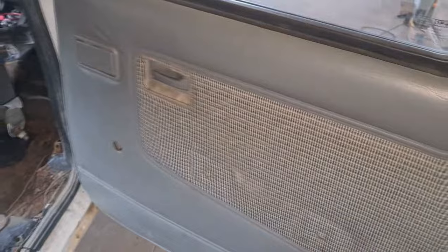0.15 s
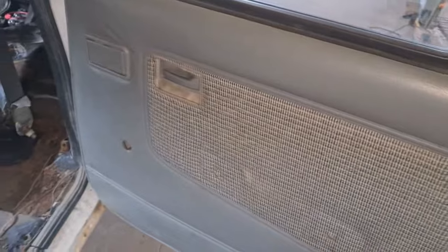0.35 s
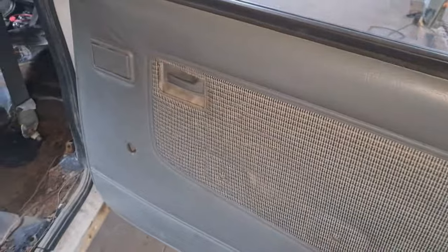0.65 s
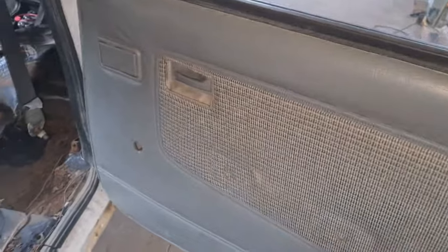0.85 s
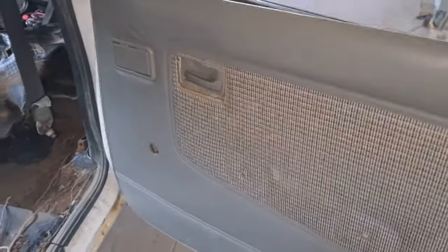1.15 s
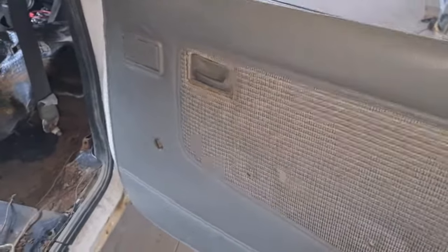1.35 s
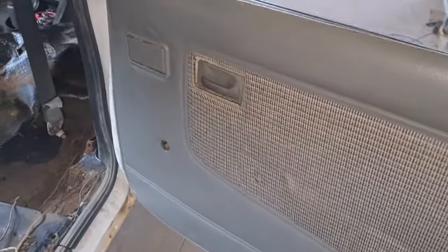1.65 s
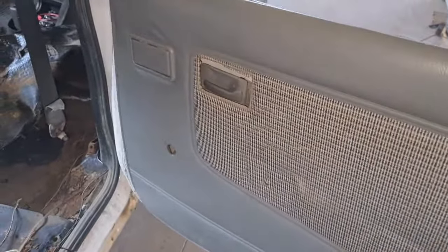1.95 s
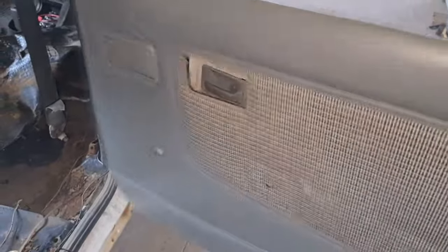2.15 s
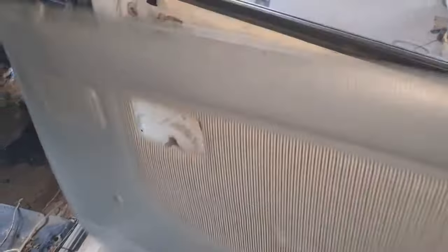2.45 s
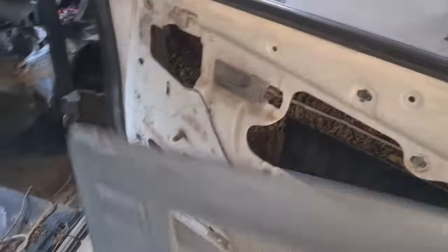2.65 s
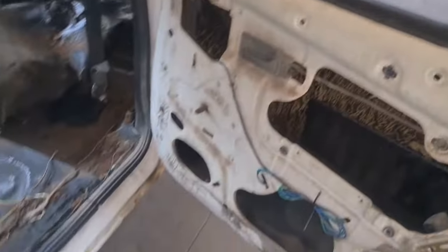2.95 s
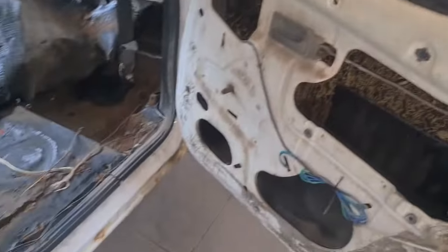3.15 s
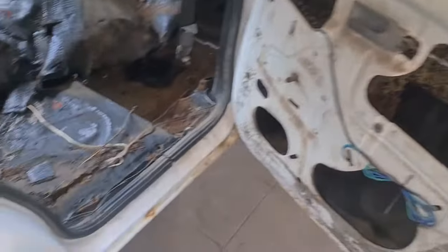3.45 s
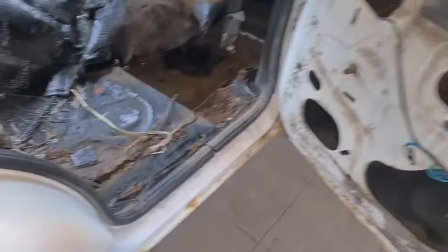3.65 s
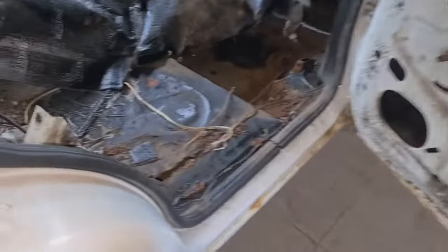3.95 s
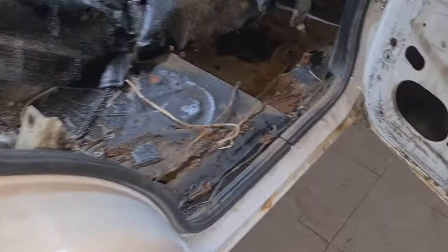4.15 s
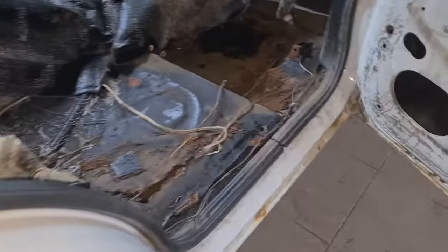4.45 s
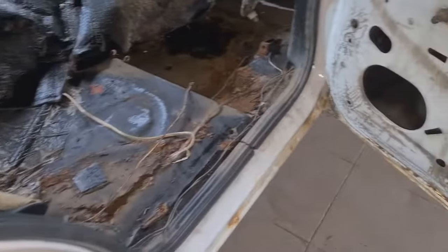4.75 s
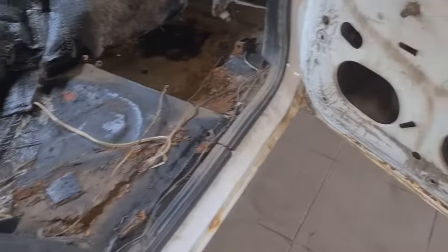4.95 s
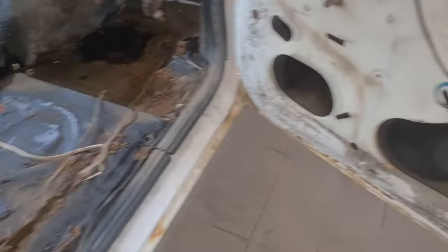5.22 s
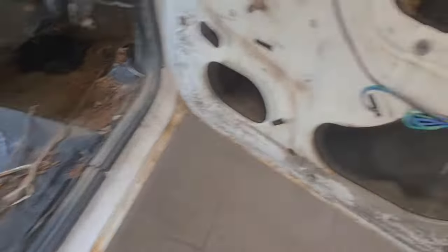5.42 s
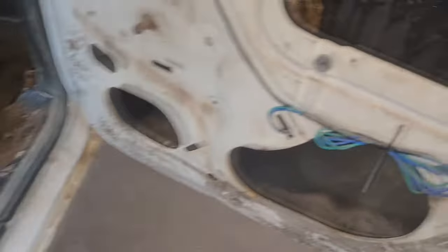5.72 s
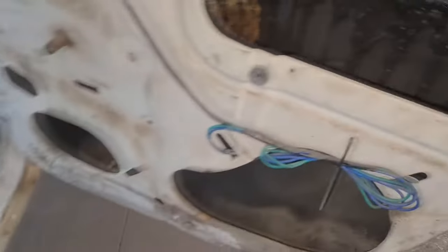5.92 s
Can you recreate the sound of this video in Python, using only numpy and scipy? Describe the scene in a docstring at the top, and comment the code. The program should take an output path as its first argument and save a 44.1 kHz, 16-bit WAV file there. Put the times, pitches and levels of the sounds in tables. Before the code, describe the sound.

Two bursts of dull plastic knocks and rattles as a door trim comes off and is set down, with gritty scrapes over low rumble.

```python
"""A low rumble and a broad hiss that swells with the handling; a hand soon slides along a plastic trim panel.
The panel is worked off a car door in a concrete garage: clips pop, it knocks and rattles; then it is set
on the floor and slides to rest amid short scrapes of panel and shoes on grit.
Blows, shaking and snaps ring damped panel modes; slides and scrapes are banded grains and noise.
A phone with two microphone ports turns with the work: lag and level shift between left and right."""
import sys
import numpy as np
from scipy import signal
from scipy.fft import rfft, irfft
from scipy.io import wavfile
from scipy.ndimage import uniform_filter1d, map_coordinates

SR = 44100
rng = np.random.default_rng(int(sys.argv[2]) if len(sys.argv) > 2 else 0)


def to_wav(sig):
    """Store sig (one row per channel, or 1-D mono) as 16-bit WAV at the path in sys.argv[1].

    Samples outside -1..1 are clipped; the rate is SR.
    """
    pcm = np.clip(np.atleast_2d(sig), -1, 1) * 32767
    pcm = np.round(pcm).astype(np.int16)
    wavfile.write(sys.argv[1], SR, pcm.T)  # frames by channels


N = 268128
T = np.arange(N) / SR
TICK_FOOT_HZ = 2000   # panel ticks lie above, sliding roar below


def amp(db):
    """dB to gain."""
    return 10 ** (np.asarray(db) / 20)


def rms_one(x):
    """Scale to rms 1."""
    return x / np.sqrt(np.mean(x ** 2) + 1e-20)


def in_spans(tables, column):
    """Smoothed gain from a dB column of several tables, silent outside them."""
    gain = np.zeros(N)
    for table in tables:
        rows = np.array(table)
        gain += amp(np.interp(T, rows[:, 0], column(rows), left=-200, right=-200))
    return uniform_filter1d(gain, size=120)


def at_hz(points, hz):
    """Read a spectrum on a log-frequency axis."""
    points = np.array(points)
    return np.interp(np.log(hz), np.log(points[:, 0] + 1), points[:, 1])


def fft_hz():
    """Bin frequencies of the full length, at least 1 Hz."""
    return np.maximum(np.fft.rfftfreq(N, 1 / SR), 1)


def drift(rate_hz):
    """Slow random curve of rms 1: noise through two equal poles, at SR / 40."""
    pole = np.exp(-2 * np.pi * rate_hz * 40 / SR)
    noise = rng.standard_normal(N // 40 + 2002)
    slow = signal.lfilter([1], [1, -2 * pole, pole ** 2], noise)[2000:]
    return np.interp(np.arange(N) / 40, np.arange(len(slow)), rms_one(slow))


def ring(clicks, hz, t60_s):
    """A unit click rings a sine of about height 1; a free sheet passes no steady push."""
    radius, w = amp(-60 / (t60_s * SR)), 2 * np.pi * hz / SR
    return signal.lfilter([.5, 0, -.5], [1, -2 * radius * np.cos(w), radius ** 2], clicks + 1e-18)


def shaped(x, spectrum):
    """Colour a signal by a spectrum."""
    return irfft(rfft(x) * amp(at_hz(spectrum, fft_hz())), N)


def grains(per_s, spread_db):
    """Random clicks of uneven size and sign; rms 1."""
    sizes = amp(spread_db * np.minimum(rng.exponential(1, N), 4)) * rng.choice([-1, 1], N)
    return rms_one(sizes * (rng.random(N) < per_s / SR))


def bandlimit(x, order, hz, kind="low"):
    """Butterworth filter."""
    return signal.sosfilt(signal.butter(order, hz, kind, fs=SR, output="sos"), x)


# Spectrum of rumble and hiss: (frequency [Hz], relative density [dB per Hz])
BED_SPECTRUM = [(18, -22), (30, -5), (86, -0.5), (437, -16.5), (499, -13.5), (780, -21.5), (3140, -22.5),
                (5040, -29.5), (5900, -52), (8300, -42.5), (11700, -35), (16000, -40.5)]
# Hiss curve, before a small random drift: (time [s], level [dB])
HISS = [(0.0, -69), (0.56, -69), (0.96, -52), (1.35, -56), (2.05, -65.5), (2.88, -75.5), (3.56, -61.5),
        (4.7, -56), (5.01, -63.5), (6.08, -63.5)]
# Port correlation of rumble and hiss: (frequency [Hz], left-right likeness [-1..1])
PORT_LIKENESS = [(60, 0.93), (240, 0.83), (950, 0.024), (3770, -0.044), (15000, -0.01)]
RUMBLE_DB = -66


def rumble_and_hiss():
    """Noise split in two: a low rumble, alike at both ports, and a broad hiss that swells with the handling."""
    mid, side = shaped(rng.standard_normal((2, N)), BED_SPECTRUM)
    alike = np.clip(at_hz(PORT_LIKENESS, fft_hz()), -.99, .99)
    mid = irfft(rfft(mid) * np.sqrt(1 + alike), N)
    side = irfft(rfft(side) * np.sqrt(1 - alike), N)
    both = np.array([mid + side, mid - side])
    rumble = signal.sosfiltfilt(signal.butter(2, 350, fs=SR, output="sos"), both)
    hiss_db = np.interp(T, *np.transpose(HISS)) + drift(3)
    return rms_one(rumble) * amp(RUMBLE_DB + 2 * drift(5)) + rms_one(both - rumble) * amp(hiss_db)


# Hand sliding along the panel: (time [s], relative level [dB])
HAND_SLIDE = [(0.06, -85), (0.09, -74.5), (0.228, -67.5), (0.35, -55.5), (0.4, -63.5), (0.442, -59),
              (0.588, -60.5), (0.648, -57.5), (0.726, -60), (0.756, -84)]
# Short scrapes of panel and shoes: (time [s], length [s], first level [dB], last level [dB],
# roar over it [dB], fine hiss over it [dB], roar pitch [Hz]); levels relative
SCRAPES = [(0.784, 0.015, -55, -51.5, 1.5, -5.5, 890), (0.894, 0.01, -53, -67, -10, 5.5, 1000),
           (1.064, .028, -47, -47, -3, -25, 1194), (2.02, 0.065, -39, -55.5, 12.5, -7, 431),
           (2.102, 0.043, -37, -65.5, -6, -5, 450), (2.884, 0.083, -69.5, -56, -4, -2, 1080),
           (3.194, 0.058, -56.5, -53, 0, -6.5, 1530), (3.429, 0.025, -42, -57.5, 1, 6, 1450),
           (3.45, 0.091, -48.5, -61, -2.5, 11.5, 1280), (3.955, 0.013, -37, -45, 6.5, -1, 710),
           (3.981, 0.13, -59.5, -53.5, -3, 1.5, 860), (4.152, 0.015, -90, -59.5, -21.5, 5.5, 970),
           (4.438, 0.066, -65, -43, 4.5, 2, 1150), (4.671, 0.046, -54, -49, -1.5, -0.5, 1050),
           (4.736, 0.059, -42, -57, 1, 0.5, 1220), (4.85, 0.032, -55.5, -49, -3, 0.5, 1000),
           (4.903, 0.045, -42.5, -64.5, 2.5, 2.5, 1210), (4.969, 0.062, -68, -60, -13, -4, 860),
           (5.208, 0.074, -50, -47, -3.5, -0.5, 1230), (5.945, 0.034, -69.5, -51.5, -0.5, 0, 1180)]
SCRAPE_ATTACK_S, SCRAPE_STOP_DB_PER_S = 0.0093, 895.5


def slide_gains():
    """One gain per slide: the hand follows its curve; a short scrape bites, drifts in level and stops."""
    start_s, length_s, first_db, last_db = np.transpose(SCRAPES)[:4, :, None]
    since_s = T - start_s
    db = first_db + (last_db - first_db) * np.clip(since_s / length_s, 0, 1)
    db = db - SCRAPE_STOP_DB_PER_S * np.maximum(since_s - length_s, 0)
    scrapes = amp(np.maximum(db, -200)) * np.clip(since_s / SCRAPE_ATTACK_S, 0, 1)
    return np.vstack([in_spans([HAND_SLIDE], lambda rows: rows[:, 1]), scrapes])


# Grit spectrum, before band levelling: (frequency [Hz], relative density [dB per Hz])
GRIT_SPECTRUM = [(200, -21), (350, 10.5), (1000, -30), (2200, 1), (3200, 8), (4500, -0.5), (5800, -9),
                 (7500, -18.5), (9000, -11.5), (13500, -12), (15600, -9.5), (17000, -19)]
HAND_ROAR_DB, HAND_HISS_DB, HAND_ROAR_HZ = -7, -2.5, 1200
HAND_PITCH_HZ, SCRAPE_PITCH_HZ = 2850, 3370
FOCUS_DB = 15.5   # lost one octave from the roar or scrape pitch, growing as octaves squared
BODY_DB = -5.5   # roar and scrape bands
GRIT_FLUTTER_DB = 2


def slides():
    """Grit rolling under a sliding surface: dense grains plus noise that differs at each port."""
    grit = shaped(grains(6000, spread_db=-6.5) + 1.4 * rng.standard_normal((2, N)), GRIT_SPECTRUM)
    hand = [HAND_ROAR_DB, HAND_HISS_DB, HAND_ROAR_HZ]
    roar_db, hiss_db, roar_hz = np.vstack([hand, np.array(SCRAPES)[:, 4:]]).T
    pitch_hz = np.array([HAND_PITCH_HZ] + [SCRAPE_PITCH_HZ] * len(SCRAPES))
    gains = slide_gains()
    edges_hz = [350, 500, 700, 950, 1250, 1600, 2000, 2500, 3100, 3800, 4700, 5800, 17000]
    out = 0
    for low, high in zip(edges_hz, edges_hz[1:]):
        band = rms_one(bandlimit(grit, 4, [low, high], "band"))
        centre_hz = np.sqrt(low * high)
        if high <= TICK_FOOT_HZ:
            db = roar_db + BODY_DB - FOCUS_DB * np.log2(centre_hz / roar_hz) ** 2
        elif high <= 5800:
            db = BODY_DB - FOCUS_DB * np.log2(centre_hz / pitch_hz) ** 2
        else:
            db = hiss_db
        flutter = amp(1.9 * drift(76) + GRIT_FLUTTER_DB * drift(14))
        out = out + band * (amp(db) @ gains) * flutter
    return out


# Shaking of the loose panel, on the door then on the floor: (time [s], shake [dB], brightness [dB])
SHAKING = [
    [(0.3, -59, 9), (0.5, -54, 12), (0.74, -43, -11), (0.85, -47.5, 11), (0.95, -27.5, -11),
     (0.99, -35, 7.5), (1.1, -52, 9.5), (1.22, -67, 14), (1.36, -29, 4), (1.49, -32.5, 5), (1.6, -31, -7),
     (1.75, -21, -11.5), (1.84, -42, 1), (1.99, -34.5, -4), (2.07, -20.5, -6.5), (2.14, -30, -6),
     (2.25, -58, 13), (2.4, -56.5, 1)],
    [(3.96, -32.5, 1.5), (4.148, -49, 8.5), (4.39, -59, -17), (4.528, -19, -11), (4.592, -78, -9),
     (4.698, -29, -1.5), (4.83, -43, 1.5), (4.892, -35, 1), (4.992, -39, -14), (5.2, -50, -19)],
]
# Thud, clack, tick response to shaking: (level at full shake [dB], slope [dB per dB of shake],
# share [dB per dB of brightness])
SHAKE_LAW = [(-23.5, 1.12, 0.16), (-32, 1.32, 1.5), (-34, 1.42, 0.96)]
FULL_SHAKE_DB = -25


def rattle():
    """Light shaking is dull, hard shaking bright: gains and clicks for thud, clack and tick modes."""
    gains = [in_spans(SHAKING, lambda rows: full_db + slope * (rows[:, 1] - FULL_SHAKE_DB) + share * rows[:, 2])
             for full_db, slope, share in SHAKE_LAW]
    clicks = [grains(per_s * amp(3.9 * drift(15)), spread_db=1.5) for per_s in (200, 1500, 4000)]
    return gains, clicks


CRACK_DB, CRACK_PER_CLACK, CRACK_PER_HARDNESS = -37, 0.84, 0.52   # slopes: dB per dB
SET_DOWN_S, GRIT_CRACK_DB = 3.9, 8.5   # blows on the gritty floor crack brighter
CRACK_T60_S = 0.033


def contact_crack(at, force, start_s, clack_db, hard_db):
    """The contact itself: bright noise, dying after each hit."""
    db = CRACK_DB + CRACK_PER_CLACK * clack_db + CRACK_PER_HARDNESS * hard_db
    db = db + GRIT_CRACK_DB * (start_s > SET_DOWN_S)
    hits = np.zeros(N)
    np.add.at(hits, at, np.abs(force) * amp(db)[:, None])
    envelope = signal.lfilter([1], [1, -amp(-60 / (CRACK_T60_S * SR))], hits + 1e-18)
    return bandlimit(envelope * rng.standard_normal((2, N)), 4, 7500, "high")


# Blows on the panel: (time [s], clack [dB], thud over it [dB], hardness [dB],
# thud pitch [Hz], clack pitch [Hz]); levels relative
BLOWS = [(0.344, -53.5, 5.5, 11.5, 167, 1140), (0.504, -48.5, 8.5, 0, 133, 1090),
         (0.552, -51, 6, -12, 166, 525), (0.615, -41.5, -11, -15, 209, 596),
         (0.638, -34, -17.5, -14, 164.4, 1160), (0.677, -38, -29, -15, 186, 1420),
         (0.748, -60, 13.5, -15, 171.3, 571), (0.791, -56.5, 14.5, -7, 222, 713),
         (0.819, -17.5, -2.5, -18, 194, 745), (0.844, -35.5, 9.5, -6, 214, 519),
         (0.864, -35.5, 9, -4, 123, 1210), (0.947, -34, 13, -6, 257, 649), (0.963, -27.5, 9, -10, 213, 660),
         (0.973, -27.5, 0, -4, 215, 480), (0.982, -24, 4.5, -6, 260, 506),
         (1.005, -26.5, -2, -13, 190, 595), (1.023, -27.5, 2.5, -7.5, 265, 549),
         (1.035, -31.5, 8.5, -14, 223, 473), (1.065, -17.5, -28, -12, 219, 1010),
         (1.073, -18, -24, 2, 338.5, 1042), (1.085, -23.5, 0.5, 1.5, 187, 1202),
         (1.295, -37.5, 4.5, -5.5, 176, 748), (1.324, -37.5, 1, -24, 183, 1610),
         (1.352, -19, -17, -6, 234, 666), (1.368, -17, -23, -19, 237, 724),
         (1.434, -8.5, -16.5, -6.5, 208, 511), (1.444, -13, -3, -18, 255, 482),
         (1.458, -22, -2, -15, 218, 563), (1.508, -32.5, 2.5, -1, 213, 1390),
         (1.522, -25, -4.5, 0, 109, 506), (1.564, -26.5, -9, -36, 209, 592),
         (1.613, -23.5, -10.5, -38, 204, 517), (1.637, -26, -3, -46, 250, 690),
         (1.702, -24.5, -5, -13.5, 174, 710), (1.715, -18.5, -15, -28, 136, 570),
         (1.729, -15, -13.5, -13.5, 222, 730), (1.794, -23, -6.5, -18.5, 96.9, 644),
         (1.818, -32.5, -19, -6.5, 83.4, 560), (1.884, -38, -1.5, -34, 240, 530),
         (1.898, -35, -9, -29, 174, 701), (1.909, -25, -23, -11.5, 137, 780),
         (1.933, -31.5, -5, -44, 191, 596), (1.954, -37, -8, -20, 153, 1210),
         (2.016, -32, 8, -25, 302, 486), (2.024, -21, 1, -9, 353, 1100), (2.035, -12.5, -28, -15, 246, 592),
         (2.048, -16.5, -6, -25, 283, 1070), (2.079, -31.5, 6.5, -25, 203, 557),
         (2.103, -19.5, -3.5, -9, 190, 480), (2.123, -26.5, -9, -8, 339, 583),
         (2.146, -38, -4.5, -12, 227, 570), (2.209, -55.5, 16.5, -28, 121, 491),
         (2.434, -58, 1, -8, 106, 1112), (3.959, -15.5, -14, -11, 180, 570),
         (4.001, -38.5, -1, -13, 352, 530), (4.271, -54.5, 8.5, -50, 282, 487),
         (4.291, -45.5, -62, -2.5, 146, 1310), (4.358, -28, -0.5, -14, 222, 520),
         (4.373, -38, 10.5, -14, 146, 895), (4.423, -36, -4.5, -2.5, 144, 530),
         (4.497, -29.5, 6, 1, 114, 1670), (4.512, -24.5, -2.5, -8, 160, 1290),
         (4.541, -37.5, -3, 1, 136, 622), (4.554, -49, 22, -2, 91, 589), (4.607, -60.5, 34, -15, 95.5, 719),
         (4.688, -39, 9, 0.5, 166, 681), (4.725, -45.5, -19.5, 6, 172, 640),
         (4.798, -45, 10.5, 2.5, 117, 1070), (4.898, -34, 4.5, -18, 251, 482),
         (4.92, -41, 12, 5, 158, 1040), (4.975, -47, 6, -17, 154, 554), (5.418, -53, -9, -8, 309, 600),
         (5.498, -55, -7, -12, 254, 560), (5.64, -57.5, -18, -8.5, 200, 1204),
         (5.736, -51.5, -4.5, -12.5, 202, 629), (5.912, -53.5, 5.5, -14, 132, 542)]
# Single sharp snaps of the panel, from clips and later from floor contact:
# (time [s], relative level [dB], pitch [Hz])
SHARP_SNAPS = [(1.0816, -10.5, 1330), (1.4365, -12.5, 576), (2.0370, -21.5, 1360), (2.435, -56.5, 1297),
               (3.9600, -38, 640), (4.295, -67, 1400), (5.7378, -42.5, 500)]
# Panel modes: (frequency [Hz], relative level [dB], t60 before limits [s])
PANEL_MODES = [(59.3, -17.5, .12), (93, -2, 0.19), (120, -6, 0.48), (153.5, 2, 0.12), (172, -2, 0.096),
               (209.3, 4.5, 0.075), (255.3, -3, 0.094), (308, 0.5, 0.065), (345, -5, 0.23),
               (394, -6, 0.066), (499, -1.5, .04), (586, -1.5, 0.043), (728.4, 3, 0.031), (944, 5, 0.0071),
               (1112, 4, 0.036), (1227, 4, 0.034), (1464, 7.5, 0.054), (1674, 5, 0.048), (1730, -3, 0.039),
               (2030, -4, 0.014), (2450, 2, 0.0061), (2650, -4, 0.009), (3046, -1.5, 0.017),
               (3420, -6, 0.014), (4160, -12, .007), (4560, -30, 0.002), (5300, -15.5, .006)]
THUD_TOP_HZ = 370
THUD_DB, CLACK_DB, TICK_DB = 6, -1.5, 9
CHATTER_MS = 7   # mean bounce delay
LOSS_CYCLES = 26   # longest t60 of a mode, in cycles


def panel(bounces=40):
    """A blow is a hit and a dying chatter; where it lands picks the modes near its thud and clack pitch."""
    start_s, clack_db, thud_db, hard_db, thud_hz, clack_hz = np.transpose(BLOWS)
    count = len(start_s)
    later = rng.exponential(1, (count, bounces)) * (np.arange(bounces) > 0)
    at = np.minimum(((start_s[:, None] + later * CHATTER_MS / 1000) * SR).astype(int), N - 1)
    force = amp(-5 * later - 1.1 * (later > 0)) * rng.choice([-1, 1], at.shape)
    force /= np.sqrt(np.sum(force ** 2, axis=1, keepdims=True))
    shake_gain, shake_clicks = rattle()
    snap_s, snap_level_db, snap_hz = np.transpose(SHARP_SNAPS)
    out = np.zeros((2, N))
    for hz, level_db, t60_s in PANEL_MODES:
        t60_s = np.clip(t60_s, .003, LOSS_CYCLES / hz)
        if hz < THUD_TOP_HZ:
            group, hits = 0, np.eye(bounces)[0]   # first hit only
            db = THUD_DB + thud_db - 30 * np.log2(hz / thud_hz) ** 2
        elif hz < TICK_FOOT_HZ:
            group, hits = 1, force
            db = CLACK_DB - 6 * np.log2(hz / clack_hz) ** 2
        else:
            group, hits = 2, force
            db = TICK_DB + hard_db
        strength = amp(clack_db + db + level_db + rng.normal(0, 1.4, count)) * rng.choice([-1, 1], count)
        hits = hits * amp(rng.normal(0, 2.6, at.shape))   # every bounce lands on another spot
        # a wide sheet radiates its higher modes unevenly to the two ports
        lean = np.clip(hz / 2500, 0, 1) * rng.uniform(-0.39, 1, count + 1)
        scatter = np.clip(hz / 2000, 0, 1) * rng.uniform(-0.54, 0.52, at.shape)
        steady = amp(level_db - 7) / np.sqrt(t60_s * SR / 14)   # offsets build-up under steady shaking
        snap_db = snap_level_db + level_db - 22 * np.log2(hz / snap_hz) ** 2
        soft = np.exp(-2 * np.pi * 0.95 * hz / SR)   # the push builds over part of a cycle
        for port, sign in enumerate((1, -1)):
            shaking = shake_gain[group] * np.roll(shake_clicks[group], group * port * 3)
            clicks = steady * shaking * (1 + sign * lean[-1] / 2)
            np.add.at(clicks, at, hits * strength[:, None] * (1 + sign * (lean[:-1, None] + scatter)))
            clicks[(snap_s * SR).astype(int)] += amp(snap_db)
            push = signal.lfilter([(1 - soft) ** 2], [1, -2 * soft, soft ** 2], clicks)
            out[port] += ring(push, hz, t60_s)
    return out + contact_crack(at, force, start_s, clack_db, hard_db)


GARAGE_T60_S, WALL_CUT_HZ = 0.44, 1300


def garage(x):
    """A dying noise tail for each port, duller with time, alike in the bass."""
    t = np.arange(SR) / SR
    shared, own = rng.standard_normal(SR), rng.standard_normal((2, SR))
    tail = own + bandlimit(shared - own, 2, 450)
    dull = bandlimit(tail, 1, WALL_CUT_HZ)
    tail = dull + (tail - dull) * np.exp(-t / 0.03)
    tail = tail * amp(-60 * t / GARAGE_T60_S) * np.clip(t / 0.0009, 0, 1)
    tail /= np.sqrt(np.sum(tail ** 2, axis=1, keepdims=True))
    return signal.fftconvolve(x[None], tail, axes=1)[:, :N]


# Bearing of the work as the phone turns: (time [s], lag of left behind right [ms], left over right [dB])
WORK_BEARING = [(0, 0.33, -3.5), (1.2, 0.18, -2.1), (2.2, 0.18, -1.2), (2.798, -0.13, 3),
                (3.3, 0.034, -1.5), (3.7, -0.39, 3), (4.2, -0.32, -1), (4.8, -0.059, -1),
                (5.3, 0.047, -2.3), (6.08, 0.094, -1)]


def ports(x):
    """The sound reaches one port earlier, with a changing level difference, as the phone turns."""
    time_s, lag_ms, lean_db = np.transpose(WORK_BEARING)
    half_lag = np.interp(T, time_s, lag_ms) * SR / 2000   # samples
    lean = amp(np.interp(T, time_s, lean_db) / 2)
    left = map_coordinates(x[0], [np.arange(N) - half_lag], order=5) * lean
    right = map_coordinates(x[1], [np.arange(N) + half_lag], order=5) / lean
    return np.array([left, right])


PANEL_SEND_DB, SLIDE_SEND_DB = -14, -0.5   # into the garage


def scene():
    """Panel and slides, direct and through the garage, over rumble and hiss."""
    sheet, rub = panel(), slides()
    wet = garage(amp(PANEL_SEND_DB) * sheet.mean(axis=0) + amp(SLIDE_SEND_DB) * rub[0])
    return ports(sheet + rub) + wet + rumble_and_hiss()


CUTOFF_HZ = 15650


def record(dry):
    """A steep elliptic low-pass cuts the top."""
    return signal.sosfilt(signal.ellip(12, .5, 70, CUTOFF_HZ, fs=SR, output="sos"), dry)


dry = scene()
out = record(dry)
to_wav(out)
```